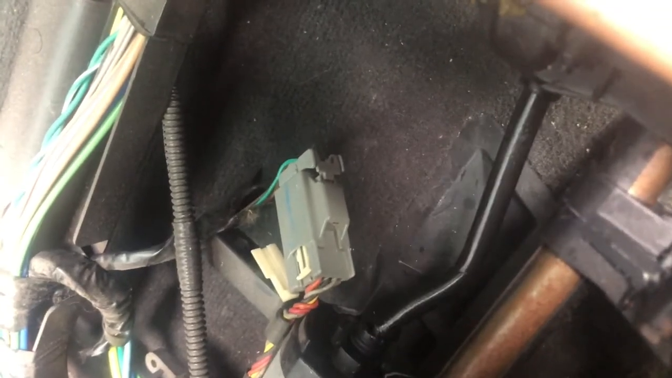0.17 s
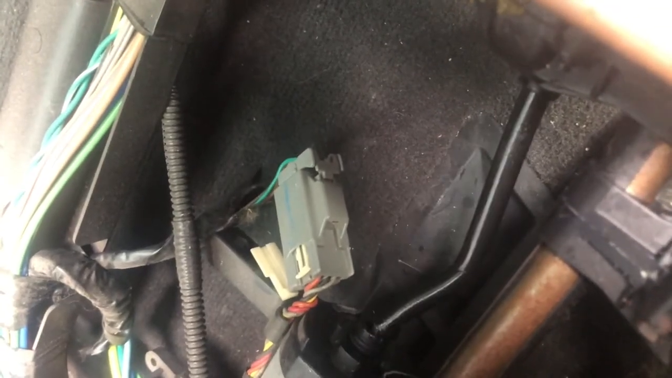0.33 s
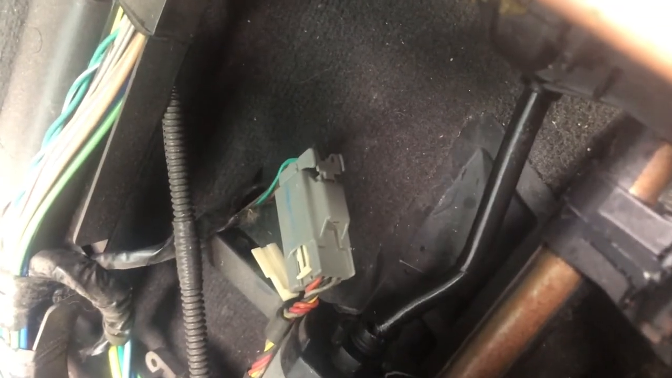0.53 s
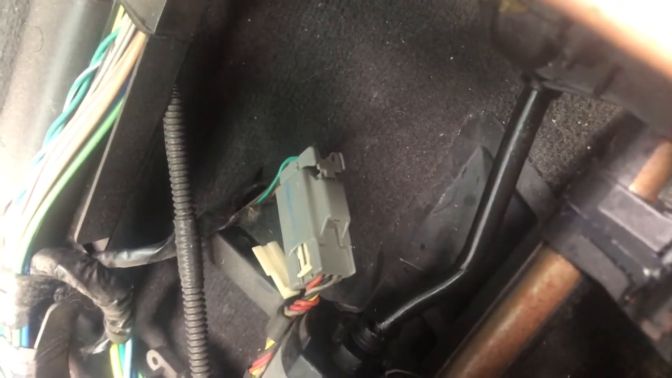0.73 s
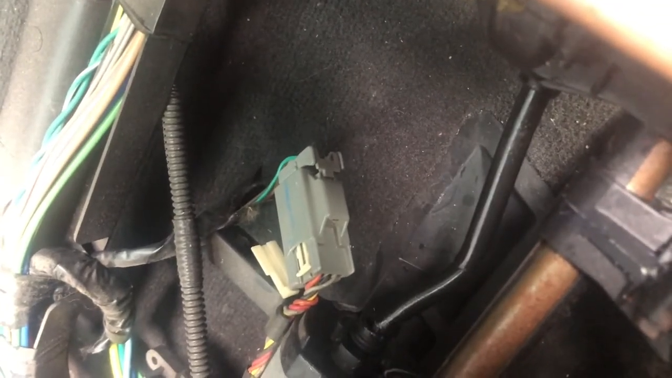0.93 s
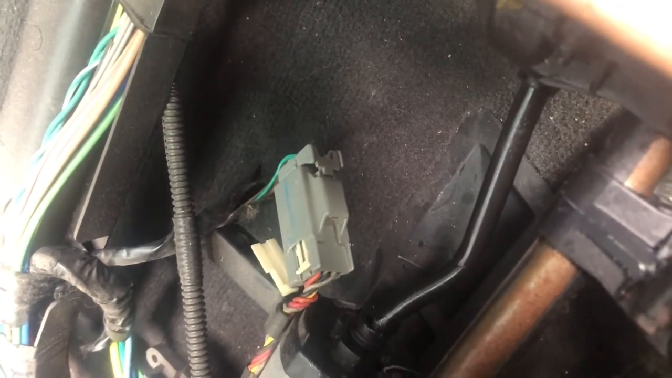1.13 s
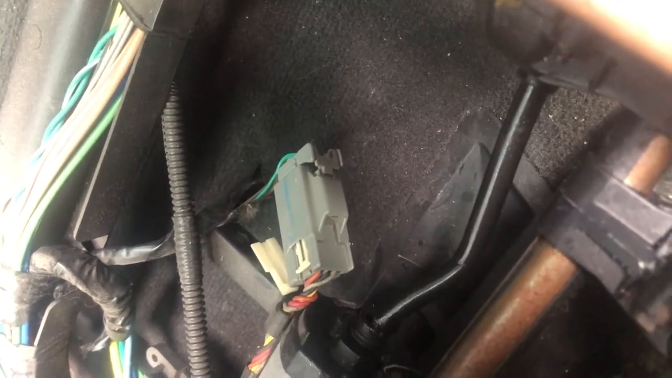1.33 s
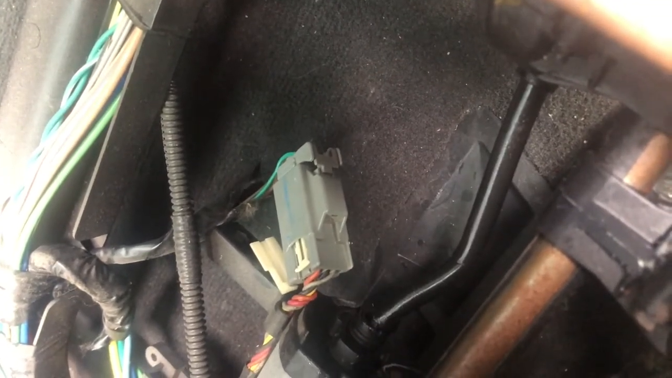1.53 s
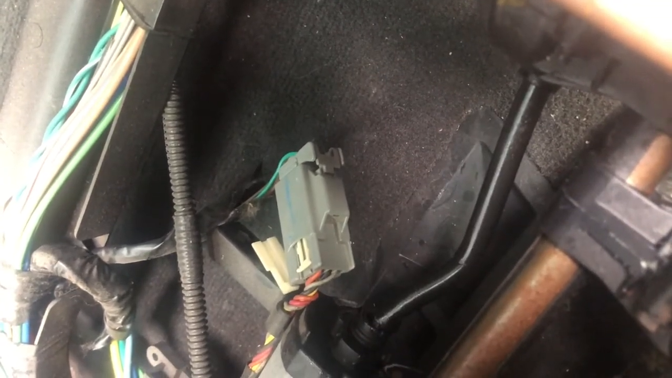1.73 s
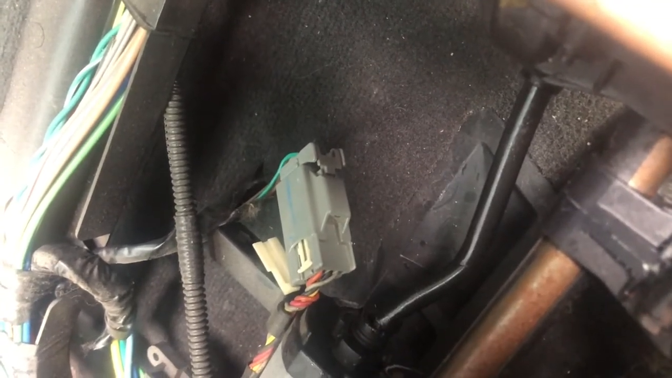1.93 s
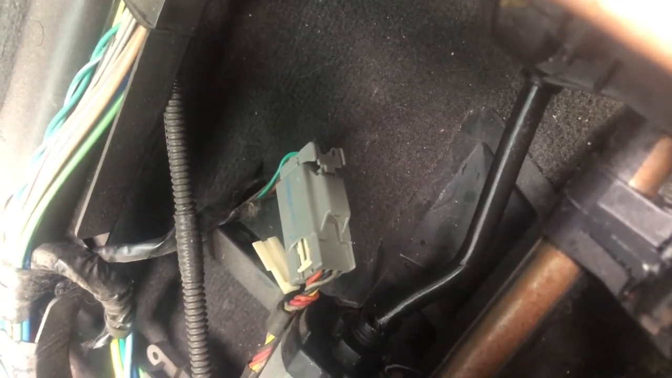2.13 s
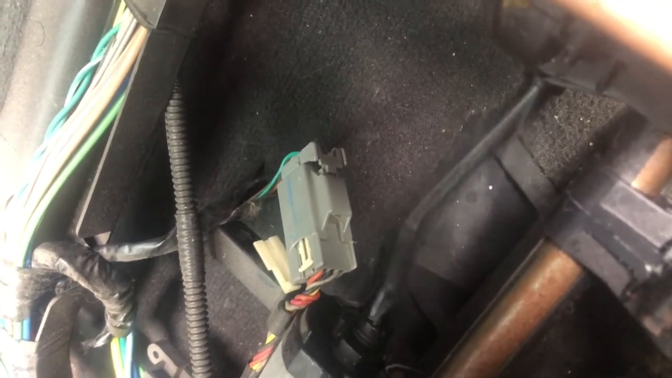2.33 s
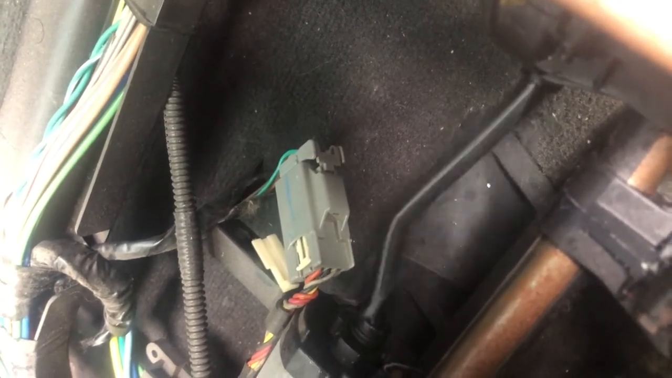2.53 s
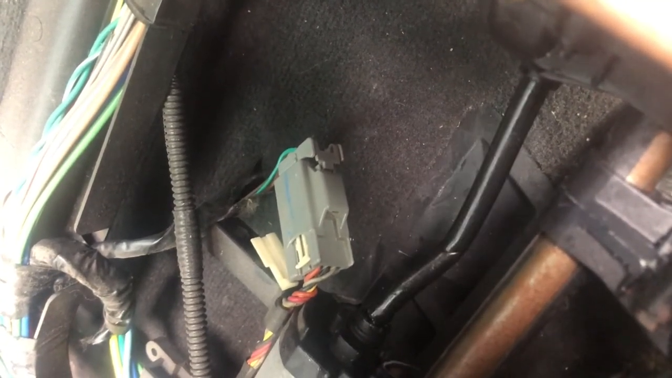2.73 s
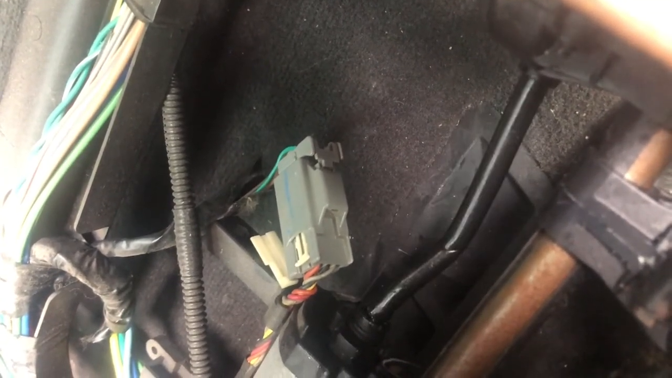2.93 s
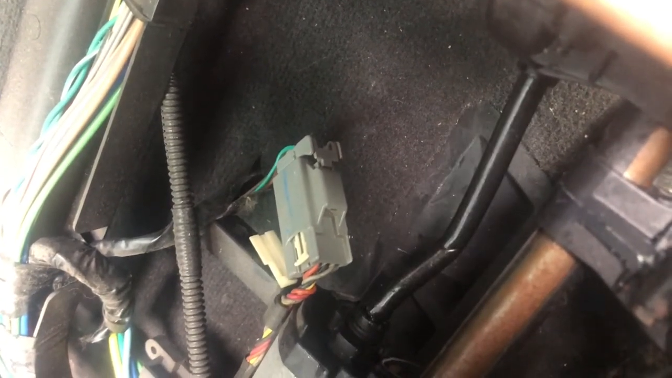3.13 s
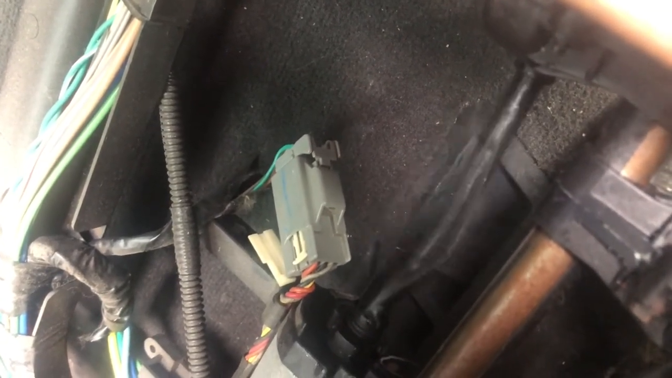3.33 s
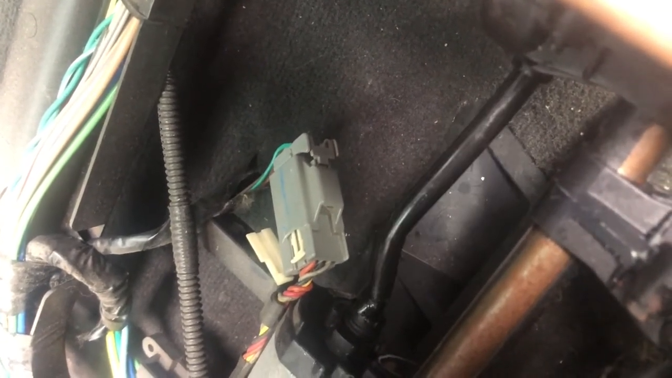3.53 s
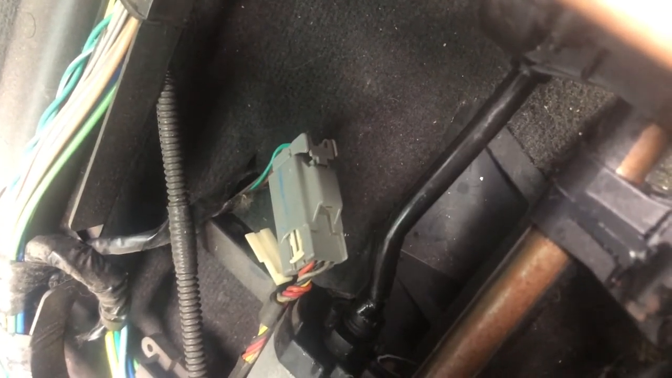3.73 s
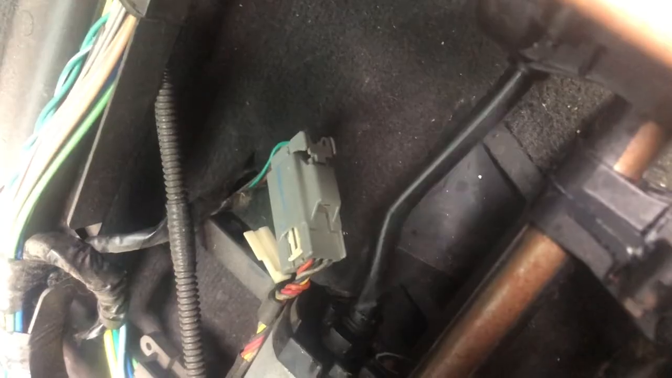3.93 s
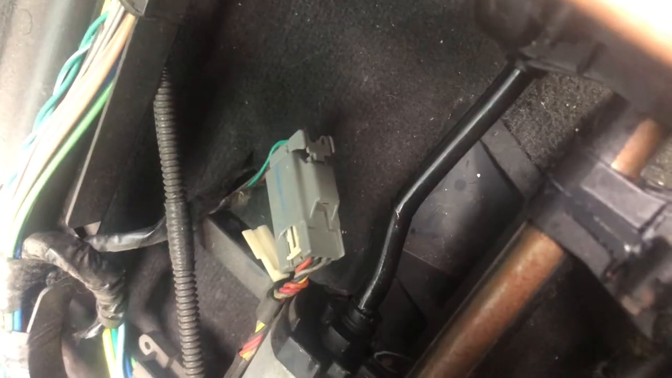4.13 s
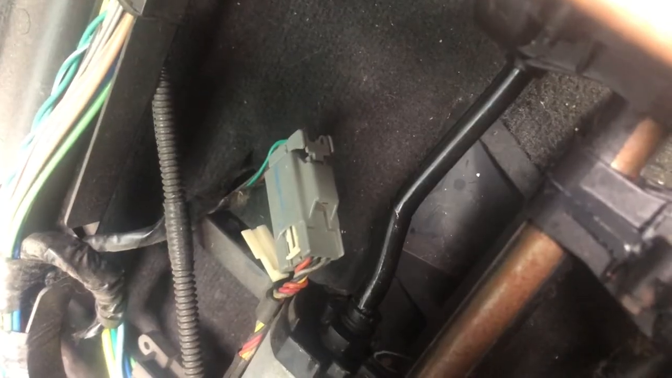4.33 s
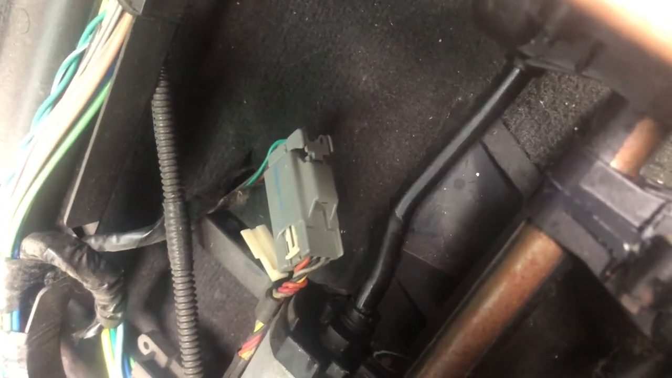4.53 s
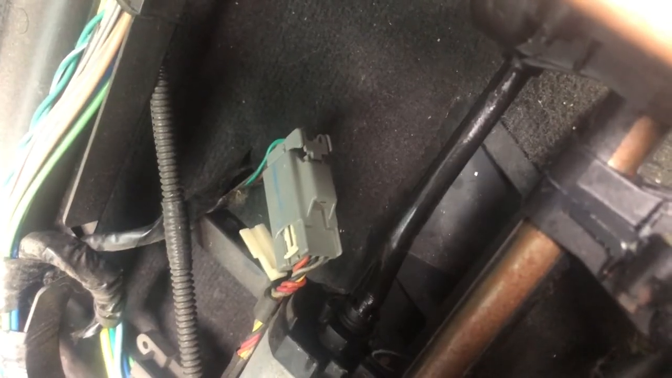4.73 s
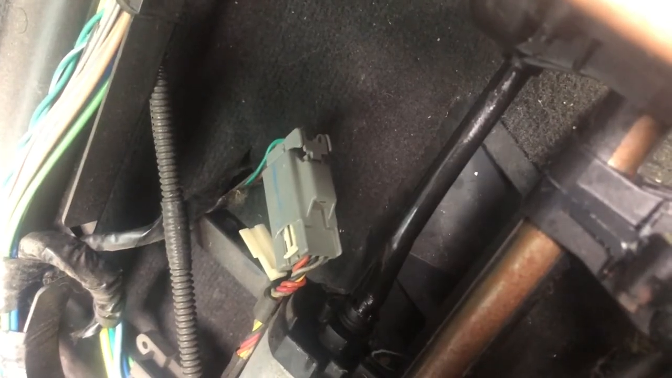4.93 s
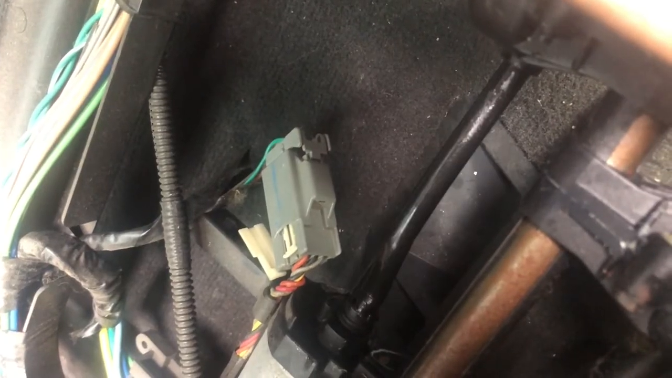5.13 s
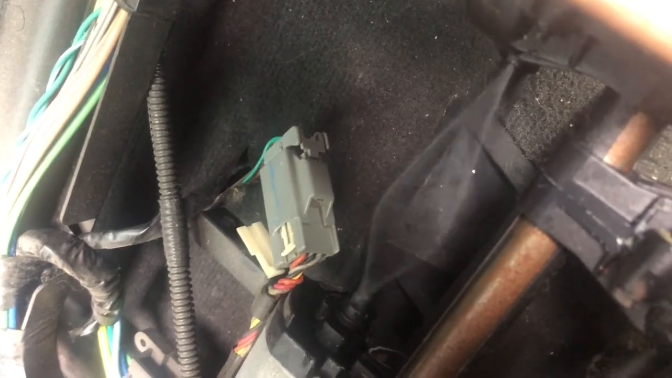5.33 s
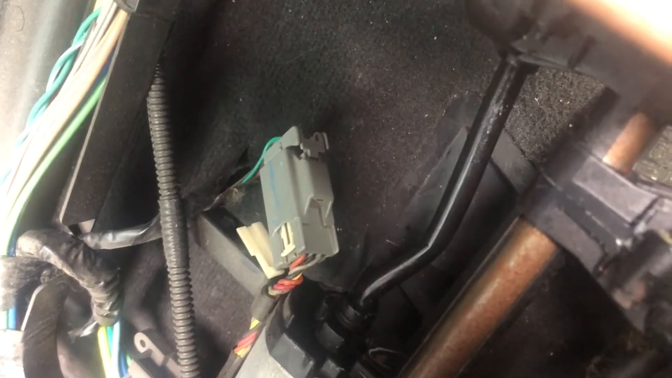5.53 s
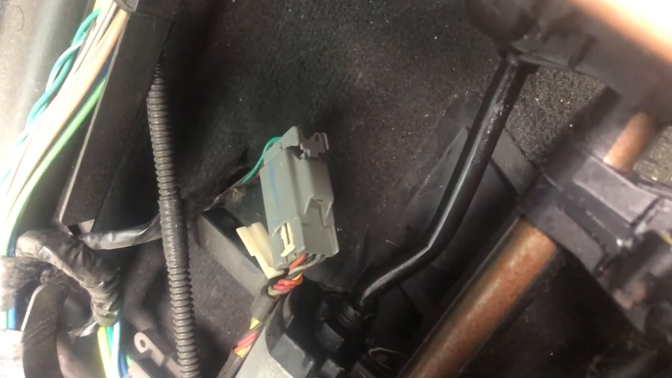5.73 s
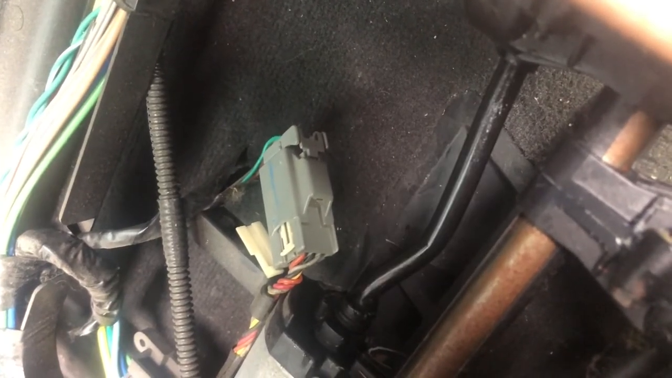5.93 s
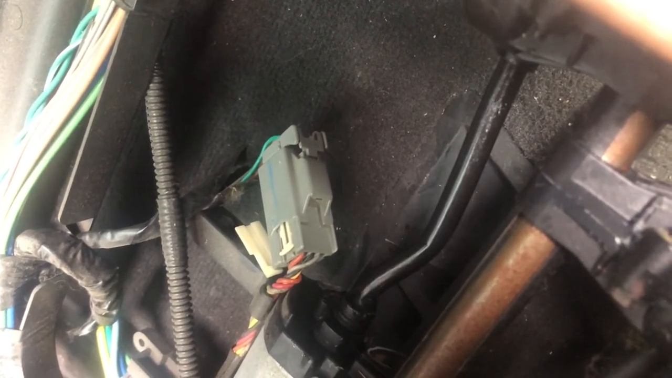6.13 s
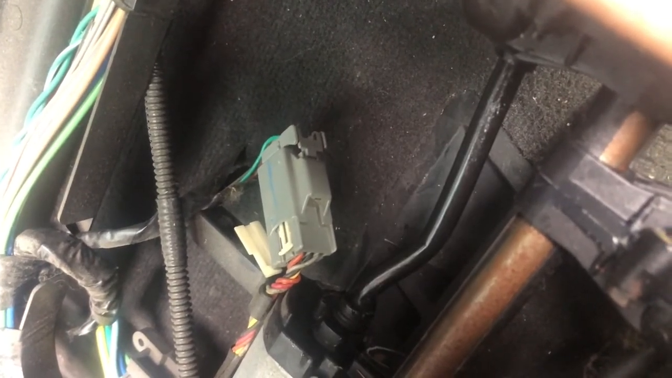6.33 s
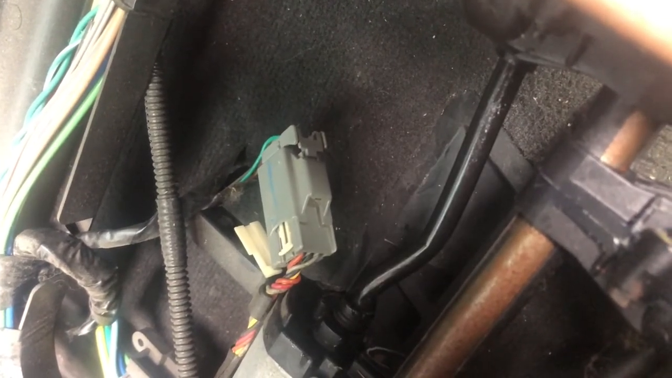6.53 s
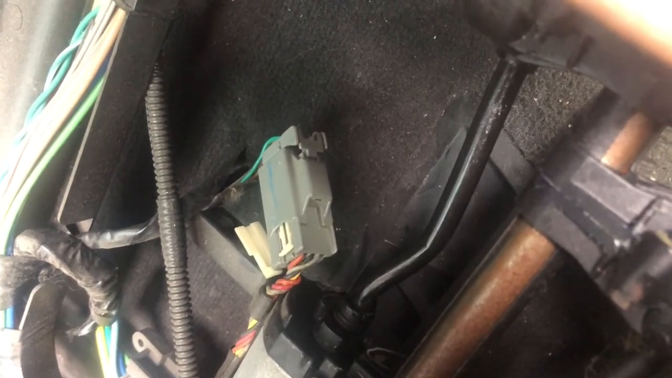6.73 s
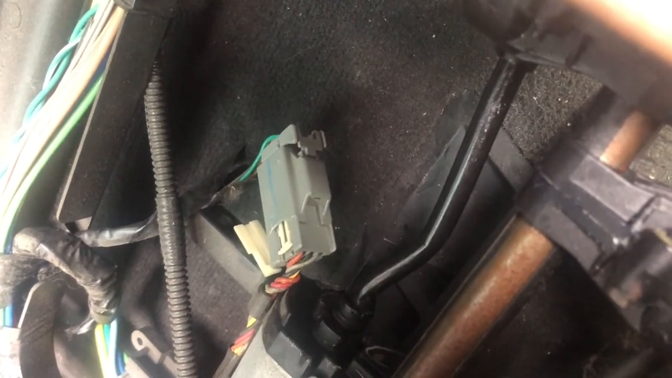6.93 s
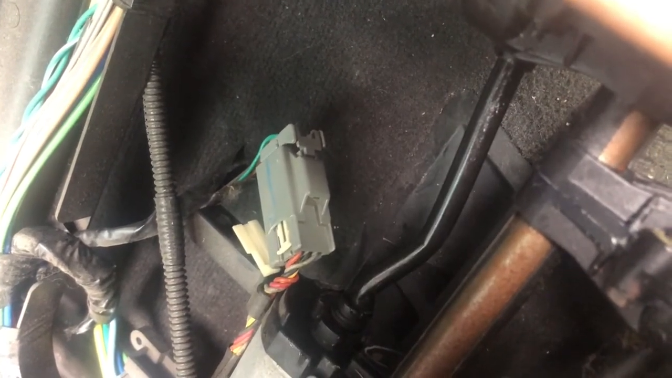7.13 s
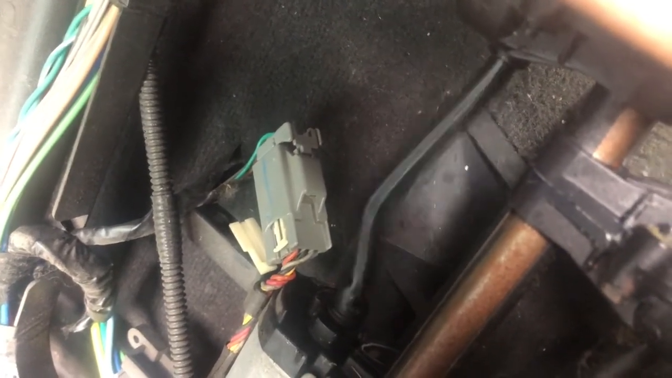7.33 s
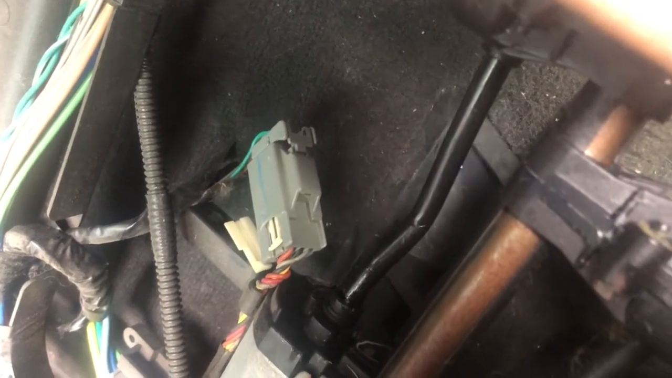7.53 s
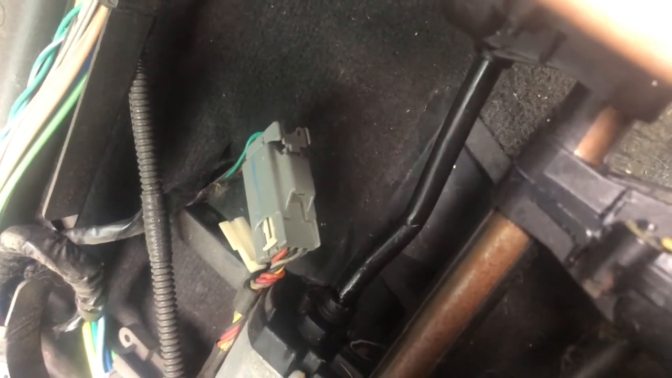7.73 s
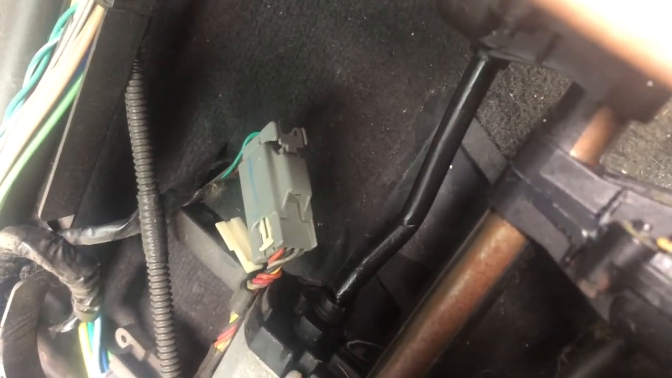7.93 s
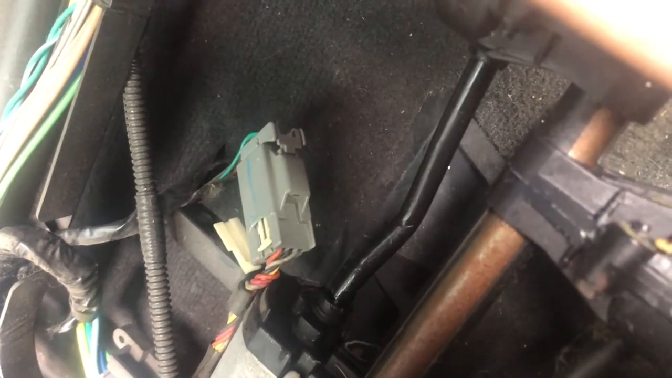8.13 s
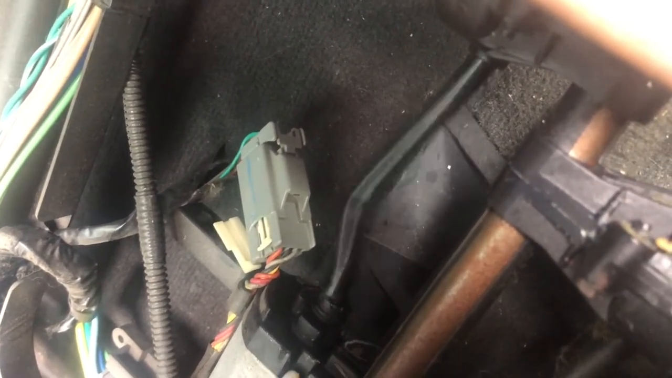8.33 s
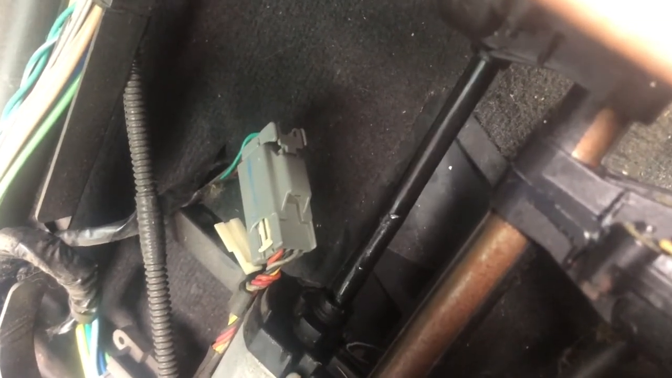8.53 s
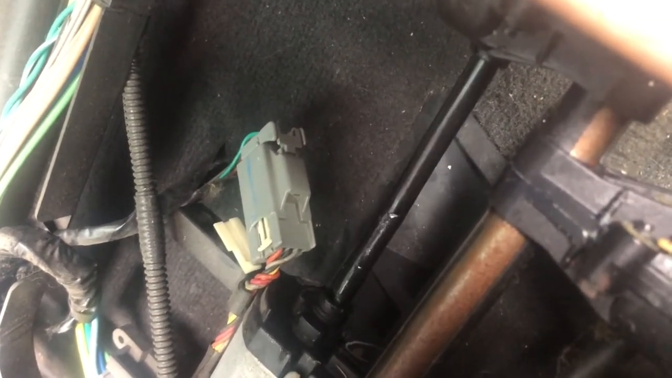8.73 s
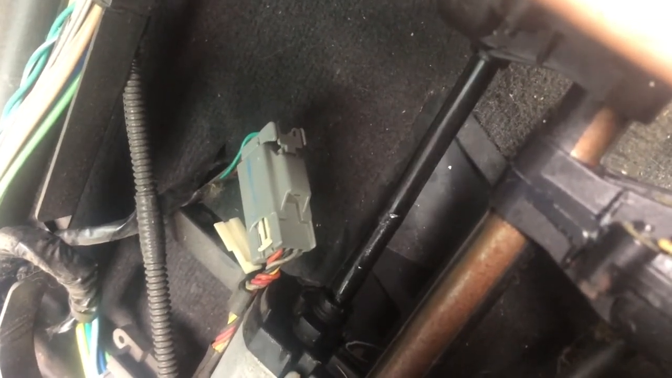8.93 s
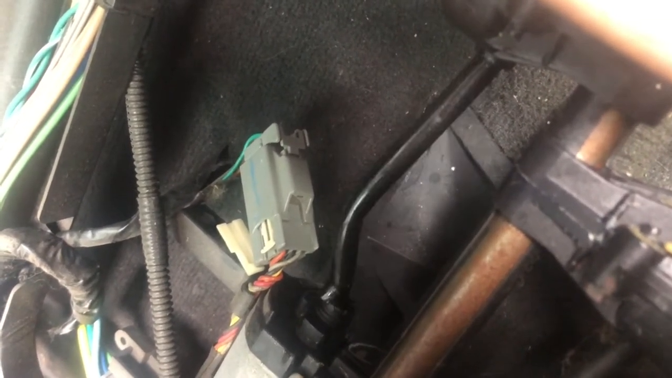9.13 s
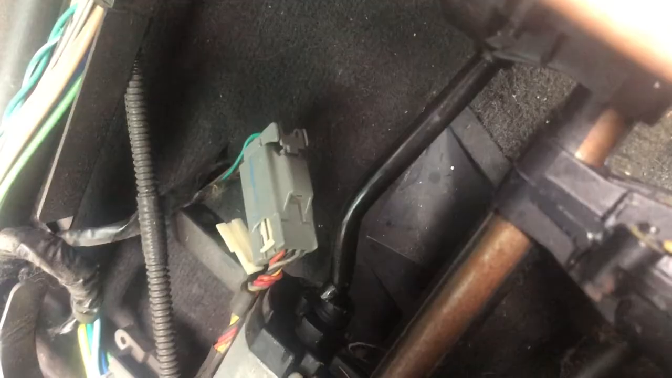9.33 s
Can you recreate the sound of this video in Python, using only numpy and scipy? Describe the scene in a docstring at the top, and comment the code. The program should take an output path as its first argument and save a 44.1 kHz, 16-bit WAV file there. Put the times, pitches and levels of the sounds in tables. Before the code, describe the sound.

Close up, a gritty geared motor is jogged briefly again and again, each burst ending in a ringing clack, over quiet outdoor air.

```python
"""A power seat motor, heard from close by under the seat, is jogged in nine short bursts over quiet outdoor air.
It opens near the end of a jog down: brushes rasp, the frame rumbles, gears knock and a ringing clack ends it.
Scrapes, taps and a faint bird fill the pauses; then five jogs go up, and after a longer pause three go down.
Before each of these a switch ticks and the drive clacks in. Filtered noise makes the rasps and hits,
decaying sines make the ringing, and gliding sines make the bird."""
import sys
import numpy as np
from scipy import signal
from scipy.fft import rfft, irfft
from scipy.io import wavfile
from scipy.ndimage import uniform_filter1d

SR = 44100
rng = np.random.default_rng(int(sys.argv[2]) if len(sys.argv) > 2 else 0)


def file_out(sig):
    """Save sig as 16-bit WAV at sys.argv[1]."""
    # one column per channel
    cols = np.atleast_2d(sig).T
    # limit, then scale
    lim = np.clip(cols, -1, 1)
    pcm = np.round(lim * 32767).astype(np.int16)
    wavfile.write(sys.argv[1], SR, pcm)


N = 413658
TIME = np.arange(N) / SR
AGE = np.arange(16384) / SR  # time axis of every impulse response [s]
# In the tables, levels are relative: each layer's own gain and filters follow.


def undb(db):
    """Decibels to gain."""
    return 10 ** (np.asarray(db) / 20)


def unit(x):
    """Scale to rms 1."""
    return x / np.sqrt(np.mean(x ** 2))


def noise():
    """White noise."""
    return rng.standard_normal(N)


def walk(rate):
    """Smooth random wander of rms 1; a higher rate [Hz] wanders faster."""
    k = int(SR / rate)
    return unit(uniform_filter1d(uniform_filter1d(noise(), k), k))


def through(x, response):
    """Pass a sound through an impulse response."""
    return signal.oaconvolve(x, response)[:N]


def colour(points, size=4096):
    """Minimum-phase response of unit energy, its spectrum shaped like the (frequency [Hz], level [dB]) points."""
    hz, db = np.transpose(points)
    bins = np.maximum(np.arange(size // 2 + 1) * SR / size, 1)
    level = np.interp(np.log(bins), np.log(hz), db)
    cepstrum = irfft(np.log(undb(level)))
    # folding the cepstrum forward makes the response causal
    cepstrum[1:size // 2] *= 2
    cepstrum[size // 2 + 1:] = 0
    response = irfft(np.exp(rfft(cepstrum)))
    return response / np.linalg.norm(response)


def fade(t60):
    """Exponential decay by 60 dB in t60 [s]."""
    return np.exp(-np.log(1000) * AGE / t60)


def scatter(t60, rise_s=0):
    """Dense dying reflections of unit energy that build up over rise_s."""
    rise = np.minimum((AGE + 1 / SR) / (rise_s + 1 / SR), 1)
    tail = rng.standard_normal(len(AGE)) * fade(t60) * rise
    return tail / np.linalg.norm(tail)


def ring(modes):
    """Struck modes: a sum of decaying sines."""
    return sum(undb(db) * fade(t60) * np.sin(2 * np.pi * hz * AGE) for hz, db, t60 in modes)


def add(track, s, sound):
    """Mix a sound into a track at time s."""
    i = max(int(s * SR), 0)
    track[i:i + len(sound)] += sound[:N - i]


def swell(s, length):
    """Rounded gate from s to s + length."""
    return np.sqrt(np.maximum(1 - (2 * (TIME - s) / length - 1) ** 2, 0))


def blows(rows, points, crack, t60, tail_db, tail_t60, likeness, rise_s=0):
    """Each blow is a crack, a short rattle in the part (partly the same every time) and a tail under the seat."""
    track = np.zeros(N)
    own = scatter(t60, rise_s)
    share = np.clip(likeness, 0, 1)
    for s, db in rows:
        rattle = np.sqrt(share) * own + np.sqrt(1 - share) * scatter(t60, rise_s)
        hit = rattle + undb(tail_db) * scatter(tail_t60)
        hit[int(rise_s * SR)] += crack
        add(track, s, undb(db) * hit)
    return through(track, colour(points))


def strikes(rows, response):
    """The same response at every (time [s], level [dB])."""
    track = np.zeros(N)
    for s, db in rows:
        add(track, s, undb(db) * response)
    return track


# bending waves in the trim are slow in the bass: lag of the deepest notes [s], pitch at which it has halved [Hz]
BASS_LAG_S, BASS_LAG_HZ = 0.03, 100.6


def bend(x):
    """Travel through the trim: the click arrives first, the low thump last."""
    hz = np.arange(len(AGE) // 2 + 1) * SR / len(AGE)
    phase = 2 * np.pi * BASS_LAG_S * BASS_LAG_HZ * np.log1p(hz / BASS_LAG_HZ)
    return through(x, irfft(np.exp(-1j * phase)))


# tone of the air, heavy in the bass: (frequency [Hz], level [dB])
AIR_COLOUR = [(25, -20), (108, 3), (200, -14.5), (340, -12), (560, -21), (900, -19.5), (2200, -34.5),
              (3400, -33), (7800, -40), (8700, -36), (9600, -41), (16000, -44.5)]


def air():
    """Quiet outdoor background: coloured noise whose bass swells unevenly."""
    hush = through(noise(), colour(AIR_COLOUR))
    bass = signal.sosfilt(signal.butter(1, 300, fs=SR, output="sos"), hush)
    return undb(-59) * (hush + bass * (undb(3.5 * walk(13.0)) - 1))


# the frame's broad dull body: (frequency [Hz], level [dB])
FRAME_COLOUR = [(32, -34.5), (50, -4), (88, -2.5), (135, 1.5), (200, -3), (300, -14), (360, -5.5),
                (450, -13.5), (560, -23.5), (700, -13), (1700, -63)]
# the frame's deep resonances: (frequency [Hz], level [dB], t60 [s])
FRAME_MODES = [(55.3, -10, 0.53), (87.57, -1.5, 0.33), (131, -6, .16), (154.4, -3.5, 0.22)]


def frame():
    """Response of the seat frame: a broad dull body and deep modes that ring on."""
    deep = ring(FRAME_MODES)
    response = undb(-1.0) * deep / np.linalg.norm(deep)
    add(response, 0, colour(FRAME_COLOUR))
    return response


# one row per jog of the seat; the first is already under way:
# (on [s], off [s], direction, wait until the first regular gear knock [s],
#  brush level [dB], rumble level [dB], spin-up [s])
JOGS = [(-.06, 0.083, "down", 0.11, -41.5, -27.5, .027), (2.2678, 2.599, "up", 0.016, -43.5, -33.5, 0.0039),
        (3.1686, 3.461, "up", 0.071, -43, -30, 0.035), (3.8286, 4.0696, "up", 0.033, -44.5, -29.5, 0.032),
        (4.5293, 4.7096, "up", 0.02, -45, -32.5, 0.017), (5.1993, 5.4005, "up", 0.02, -44, -31, 0.02),
        (7.2201, 7.3515, "down", .0235, -44, -29.5, 0.053),
        (8.1999, 8.4228, "down", 0.096, -40.5, -27, 0.097),
        (8.9412, 9.094, "down", .038, -41.5, -28, 0.052)]
HUM_DB = {"up": -2.5, "down": 3.5}  # {direction: hum over rumble [dB]}: the shaft swings more freely on the way down


def drive(coast_s, flex_s):
    """Strength of brush contact, of frame shaking and of shaft swing: the rumble builds as the motor spins up."""
    brush, shake, swing = np.zeros(N), np.zeros(N), np.zeros(N)
    for on, off, direction, *_, brush_db, rumble_db, spin_s in JOGS:
        age = np.arange(max(-on, 0), off - on + .5, 1 / SR)  # includes half a second of run-down
        after = np.maximum(age - (off - on), 0)
        spin_up = 1 - np.exp(-(age / spin_s) ** 2)
        rumble = undb(rumble_db) * spin_up * np.exp(-after / flex_s)
        add(brush, on, undb(brush_db) * np.exp(-after / coast_s))
        add(shake, on, rumble)
        add(swing, on, undb(HUM_DB[direction]) * rumble)
    return brush, shake, swing


def shaft_hum(turn, swing):
    """The unbalanced shaft hums at orders two to five of its turning, wavering in level."""
    hum = np.zeros(N)
    for order, db in enumerate([-8.5, -8, -13.5, -13.5], 2):
        hum += undb(db) * np.sin(order * turn + rng.uniform(0, 2 * np.pi))
    return hum * swing * undb(2.9 * walk(25))


# tone of the rasping brushes: (frequency [Hz], level [dB])
BRUSH_COLOUR = [(540, -10), (730, -1.5), (1400, -10.5), (2150, -10), (3700, -12.5), (4200, -9.5),
                (5200, -13), (5900, -9), (8300, -20), (16000, -21.5)]
SHAFT_HZ, SEGMENTS = 43.83, 10  # centre shaft speed [turns/s]; commutator segments per turn


def motor():
    """Brushes scrape over the commutator; the unbalanced shaft and worm gear shake the frame."""
    brush, shake, swing = drive(coast_s=0.0067, flex_s=0.03)
    turn = 2 * np.pi * np.cumsum(SHAFT_HZ * (1 + .03 * walk(12.04))) / SR
    segment = np.exp(.5 * np.cos(SEGMENTS * turn))
    roughness_db = 3.16 * walk(400) + 0.64 * np.cos(turn)
    grit = unit(noise() * segment * undb(roughness_db))
    housing = 1.04 * scatter(0.025)  # the motor can adds many close, short resonances
    housing[0] += .5
    rasp = through(through(grit * brush, housing), colour(BRUSH_COLOUR))
    rumble = through(undb(-2.5) * grit * shake, frame())
    return rasp + shaft_judder(segment, housing) + rumble + shaft_hum(turn, swing)


# Raising the seat, the gears turn slowly and unevenly and the weight soon closes their play;
# lowering, they run faster and keep clattering. The harder the brushes rasp, the louder the regular knocks:
# {direction: (speed [turns/s], knock over brushes [dB], rebound over brushes [dB],
#  fade [dB/s], level scatter [dB], timing jitter [s])}
GEAR_PLAY = {"up": (35.3, 22.3, 8, 56.4, 2.7, .001), "down": (43.6, 24.6, 19.1, 2.5, 1.1, .0007)}
# a tooth catches and knocks hard: (time [s], level [dB])
HARD_KNOCKS = [(0.0147, -15), (0.0711, -16.5), (2.561, -15.5), (3.225, -19), (3.2497, -16), (3.3101, -21.5),
               (3.391, -22.5), (3.8866, -14), (3.9429, -18.5), (4.0022, -15.5), (4.0275, -20),
               (4.6613, -14), (5.247, -15.5), (5.2751, -19.5), (5.3908, -19), (7.2674, -16), (7.314, -18.5),
               (7.3376, -10), (8.2932, -13.5), (8.3152, -15), (8.9766, -16.5), (9.0489, -13.5),
               (9.073, -14.5)]
# a tooth snaps back with a bright tick: (time [s], level [dB])
HARD_REBOUNDS = [(0.081, -18.5), (2.2873, -20), (2.3295, -17.5), (3.8873, -17.5), (4.033, -17),
                 (4.629, -24.5), (7.2595, -20), (7.3358, -19), (8.963, -17.5)]
REBOUND_TURNS = 0.52  # the teeth fall back this far into a turn
COAST_S, COAST_DB = .012, -9  # the gears run on after the drive lets go [s], knocking more softly [dB]


def clatter(count=16):
    """Times and levels of knocks and rebounds: about one of each per turn, hard ones replacing those nearby."""
    knocks, rebounds = list(HARD_KNOCKS), list(HARD_REBOUNDS)
    for on, off, direction, wait, brush_db, _, _ in JOGS:
        turn_hz, knock_db, rebound_db, fade_db_per_s, scatter_db, jitter_s = GEAR_PLAY[direction]
        for turn, (late, hard, bright) in enumerate(rng.standard_normal((count, 3))):
            s = on + wait + turn / turn_hz + jitter_s * late
            back = s - (1 - REBOUND_TURNS) / turn_hz
            effort_db = brush_db - fade_db_per_s * turn / turn_hz
            caught = any(abs(s - at) < .5 / turn_hz for at, _ in HARD_KNOCKS)
            if s < off + COAST_S and not caught:
                knocks.append((s, effort_db + knock_db + scatter_db * hard + COAST_DB * (s > off)))
            snapped = any(abs(back - at) < .5 / turn_hz for at, _ in HARD_REBOUNDS)
            if turn and back < off and not snapped:
                rebounds.append((back, effort_db + rebound_db + scatter_db * bright))
    return knocks, rebounds


# tone of the knocking teeth, also of the juddering shaft: (frequency [Hz], level [dB])
KNOCK_COLOUR = [(300, -21), (800, -3), (1300, -10.5), (2150, -3.5), (3300, -3), (3700, -3.5), (4200, -2),
                (6200, -3), (8200, -12.5), (16000, -19)]
# thin, bright tone of the rebounds: (frequency [Hz], level [dB])
REBOUND_COLOUR = [(1500, -18), (4500, 3.5), (7000, -10.5), (9200, 5), (10500, -5), (12200, 5), (16000, -5)]


def gears():
    """Teeth knock, which also thumps the frame, and rebound more thinly in between."""
    forth, back = clatter()
    knocks = blows(forth, KNOCK_COLOUR, crack=0.24, t60=0.012, tail_db=-11.0, tail_t60=0.045,
                   likeness=0.17, rise_s=.0002)
    rebounds = blows(back, REBOUND_COLOUR, crack=0, t60=0.016, tail_db=-12.5, tail_t60=0.028,
                     likeness=0.17, rise_s=0.0014)
    thumps = strikes(forth, frame())
    return undb(12.0) * knocks + undb(10.0) * thumps + undb(13.0) * rebounds


# tone of the drive dropping out: (frequency [Hz], level [dB])
STOP_COLOUR = [(300, -5), (830, -12.5), (1200, -2), (2900, -11.5), (4500, -16.5), (16000, -26)]
# ringing of the drive when it drops out: {direction: (frequency [Hz], level [dB], t60 [s])}
STOP_MODES = {"up": [(1194, -4, 0.11), (2370, -14.5, 0.13), (4220, -16, .1)], "down": [(1302, -1.5, 0.085),
              (2510, -11, 0.09), (4040, -18, 0.14)]}


def stop_clacks():
    """The drive drops out with a rattling clack, and its metal rings on, pitched by the direction of travel."""
    stops = [(off, 0) for _, off, *_ in JOGS]
    clack = blows(stops, STOP_COLOUR, crack=0, t60=0.042, tail_db=-10.5, tail_t60=0.092,
                  likeness=0.73, rise_s=0.0011)
    rings = np.zeros(N)
    for _, off, direction, *_ in JOGS:
        add(rings, off, ring(STOP_MODES[direction]))
    return undb(-5.5) * clack + undb(-32.5) * rings


# short soft scrapes: (time [s], length [s], level [dB])
SCRAPES = [(0.409, .19, -58), (1.5, 0.056, -60), (5.939, 0.05, -55)]
# tone of the trim, rubbed or tapped: (frequency [Hz], level [dB])
TAP_COLOUR = [(300, -4), (900, -7), (1650, -5), (2800, -13), (16000, -29.5)]


def rubbing():
    """Soft scrapes catch and slip on the trim: noise of flickering level in rounded gates."""
    scrape = sum(undb(db) * swell(s, length) for s, length, db in SCRAPES)
    grip = unit(noise() * undb(3.5 * walk(110)))
    return through(scrape * grip, colour(TAP_COLOUR))


# small taps on the seat trim: (time [s], click level [dB], woody knock level [dB])
TAPS = [(0.517, -35.5, -65), (.623, -36, -59), (1.162, -68, -62), (1.223, -72, -60), (1.462, -49.5, -62),
        (1.706, -52.5, -55.5), (1.781, -48.5, -71), (1.961, -42, -53), (2.101, -41.5, -50.5),
        (2.657, -46.5, -63), (5.736, -37.5, -55), (6.653, -34, -55), (7.861, -38.5, -52.5),
        (8.023, -45, -52), (8.142, -49, -55)]
# the hollow trim that the taps ring: (frequency [Hz], level [dB], t60 [s])
TAP_MODES = [(107, 16, 0.067), (840, 13, 0.032), (1585, -6, 0.039)]
# dull bumps on the padding, the last one as the switch is pressed before the eighth jog: (time [s], pitch [Hz],
# level [dB])
BUMPS = [(.559, 373, -42), (.6, 356, -44), (0.738, 350, -50), (8.141, 398, -30.5)]
TAP_SPREAD = 0.074  # each tap lands on another spot, which shifts every mode a little (log-frequency spread)
# the seat settles all the time: click and knock of the faintest tick, and how much louder a tick may be [dB]
SETTLE_DB, SETTLE_KNOCK_DB, SETTLE_RANGE_DB = -65.5, -73.5, 12.5
BUMP_CYCLES, BUMP_RISE_S = 31, 0.0017  # cycles until a bump has died away; its soft onset [s]


def taps():
    """Trim clicks with a woody knock and a low thump, faint settling ticks, and dull bumps on the padding."""
    settling = [(TIME[-1] * when, SETTLE_DB + SETTLE_RANGE_DB * size, SETTLE_KNOCK_DB + SETTLE_RANGE_DB * size)
                for when, size in rng.random(size=(30, 2))]
    rows = TAPS + settling
    clicks = blows([(s, db) for s, db, _ in rows], TAP_COLOUR, crack=0, t60=0.018, tail_db=-4, tail_t60=0.06,
                   likeness=0.059, rise_s=0.0013)
    wood, bumps = np.zeros(N), np.zeros(N)
    spots = rng.standard_normal((len(rows), len(TAP_MODES)))
    for (s, _, knock_db), spot in zip(rows, spots):
        modes = [(hz * np.exp(TAP_SPREAD * shift), db, t60) for (hz, db, t60), shift in zip(TAP_MODES, spot)]
        add(wood, s, undb(knock_db) * ring(modes))
    for s, hz, db in BUMPS:
        onset = 1 - np.exp(-AGE / BUMP_RISE_S)
        add(bumps, s, ring([(hz, db, BUMP_CYCLES / hz)]) * onset)
    return undb(18.5) * clicks + bend(wood) + bumps


# slurs of a distant bird: (time [s], length [s], first pitch [Hz], last pitch [Hz], level [dB])
BIRD = [(1.433, .1, 3950, 3420, -77), (1.693, 0.079, 3830, 3500, -68), (1.846, 0.07, 4700, 2800, -73.5),
        (5.104, 0.1, 4090, 3960, -68), (5.516, 0.16, 3270, 3390, -67.5), (5.744, 0.091, 4420, 3210, -70.5),
        (5.837, 0.044, 3100, 3610, -64), (5.918, 0.05, 3540, 2880, -62), (6.069, 0.18, 4900, 2860, -68),
        (6.287, 0.041, 3200, 2420, -68.5), (6.437, 0.087, 2520, 3310, -62),
        (6.544, 0.045, 3850, 2620, -60.5), (6.661, 0.057, 3000, 3700, -64.5),
        (6.758, .08, 3710, 3100, -67.5)]
SLUR_EASE = 0.82  # below 1, a slur starts gently and glides ever faster to its last pitch
BIRD_WAVER, BIRD_FLUTTER_DB, BIRD_ECHO = 0.023, 5, 0.93  # pitch spread (fraction), level spread [dB], echo gain


def bird():
    """Wavering whistled slurs, blurred by the distance."""
    song = np.zeros(N)
    for s, length, first_hz, last_hz, db in BIRD:
        u = np.linspace(0, 1, int(length * SR))
        glide_hz = last_hz * (first_hz / last_hz) ** ((1 - u) ** SLUR_EASE)
        waver = unit(uniform_filter1d(rng.standard_normal(len(u)), size=120))
        hz = glide_hz * (1 + BIRD_WAVER * waver)
        whistle = np.sin(2 * np.pi * np.cumsum(hz) / SR)
        add(song, s, undb(db) * np.sqrt(4 * u * (1 - u)) * whistle)
    return song * undb(BIRD_FLUTTER_DB * walk(76)) + BIRD_ECHO * through(song, scatter(1.0))


# the rocker switch before each jog but the first: (touch time [s], snap time [s], snap level [dB])
PRESSES = [(2.211, 2.2156, -32.5), (3.114, 3.12, -33.5), (3.775, 3.782, -38), (4.481, 4.486, -29),
           (5.144, 5.154, -40.5), (7.167, 7.171, -42.5), (8.14, 8.1533, -41.5), (8.899, 8.898, -57)]
# tone of the switch: (frequency [Hz], level [dB])
SWITCH_COLOUR = [(300, 1.5), (2500, -10.5), (4600, -5.5), (7500, -10), (9500, -22), (16000, -17.5)]
TOUCH_DB = -46  # the finger meets the rocker, on the scale of the snap levels


def switch():
    """The rocker gives a soft touch and a snap, close together; the snap also thumps the frame through the trim."""
    touches = [(touch, TOUCH_DB) for touch, *_ in PRESSES]
    snaps = [(snap, db) for _, snap, db in PRESSES]
    clicks = blows(touches + snaps, SWITCH_COLOUR, crack=0, t60=0.027, tail_db=-8.5, tail_t60=0.056,
                   likeness=0.4, rise_s=0.00088)
    thumps = strikes(snaps, frame())
    return undb(21.0) * clicks + undb(14.5) * bend(thumps)


# tone of the drive snapping in: (frequency [Hz], level [dB])
START_COLOUR = [(250, -6), (900, -8.5), (3300, -9), (3700, -14), (4300, -9), (7000, -9), (11000, -20),
                (15000, -10.5)]
# ringing metal of the drive as it snaps in: (frequency [Hz], level [dB], t60 [s])
START_MODES = [(2300, -6.5, 0.032), (3940, -2.5, 0.055), (6610, 1, 0.029), (7200, -2.5, 0.019)]


def start_clacks():
    """The drive snaps in with a rattling clack, and its metal rings on briefly."""
    starts = [(on, 0) for on, *_ in JOGS if on > 0]
    clack = blows(starts, START_COLOUR, crack=0, t60=0.0338, tail_db=-10.5, tail_t60=.06, likeness=0.43)
    return undb(-6.5) * clack + undb(-31.5) * strikes(starts, ring(START_MODES))


# the shaft judders in its bearing: (time [s], length [s], level [dB])
JUDDERS = [(2.301, 0.033, -32.5), (8.228, 0.02, -28), (8.253, 0.025, -27.5)]


def shaft_judder(segment, housing):
    """The shaft judders in its bearing: noise pulsing with the segments, coloured by the motor can."""
    gate = sum(undb(db) * swell(s, length) for s, length, db in JUDDERS)
    buzz = unit(noise() * segment ** 2) * gate
    return through(through(buzz, housing), colour(KNOCK_COLOUR))


def scene():
    """Everything at one microphone."""
    machine = motor() + gears() + stop_clacks() + start_clacks()
    handling = rubbing() + taps() + switch()
    return (air() + machine + handling + bird())[None]


def record(dry):
    """The recorder drops the deepest bass and cuts the top steeply."""
    thin = signal.sosfilt(signal.butter(5, 43, "high", fs=SR, output="sos"), dry)
    return signal.sosfilt(signal.ellip(10, .2, 80, 15900, fs=SR, output="sos"), thin)


dry = scene()
out = record(dry)
file_out(out)
```